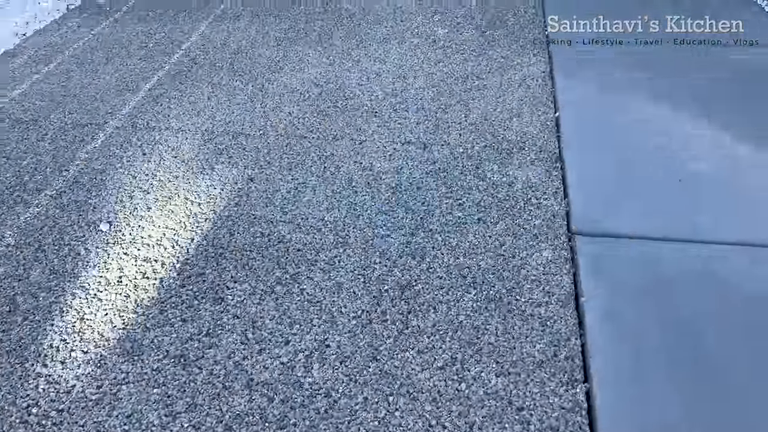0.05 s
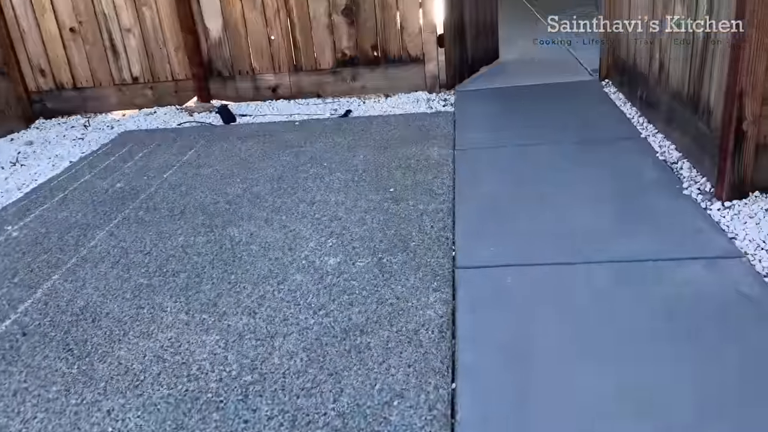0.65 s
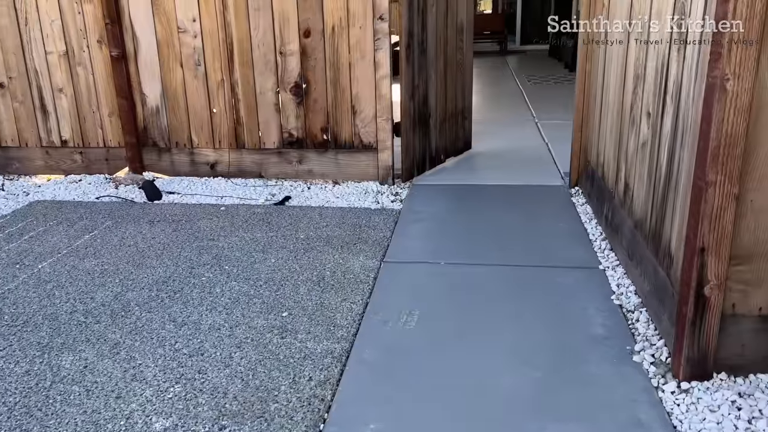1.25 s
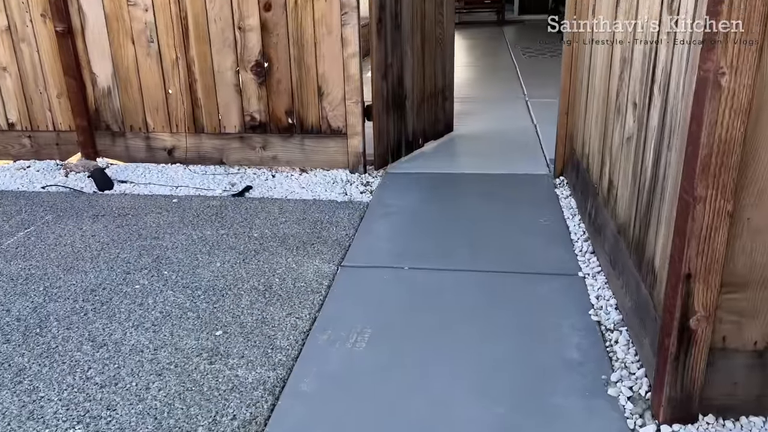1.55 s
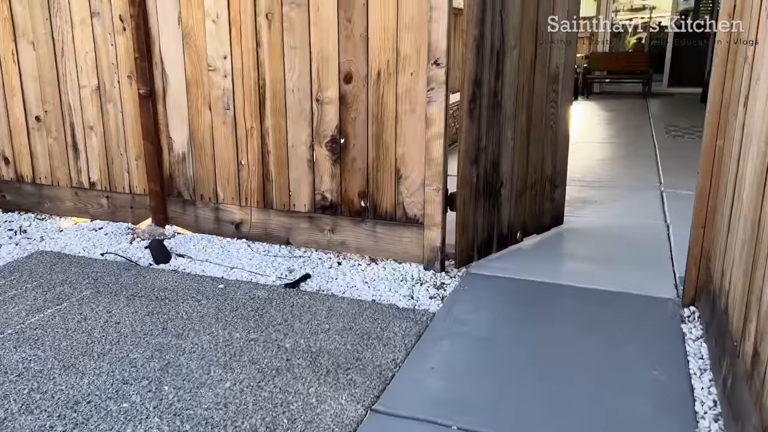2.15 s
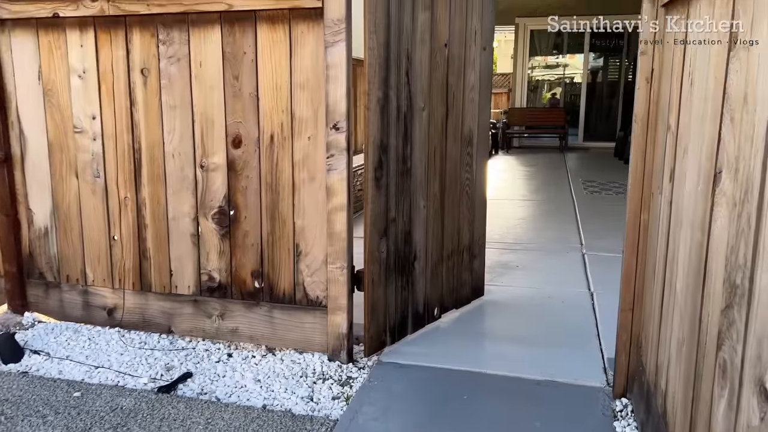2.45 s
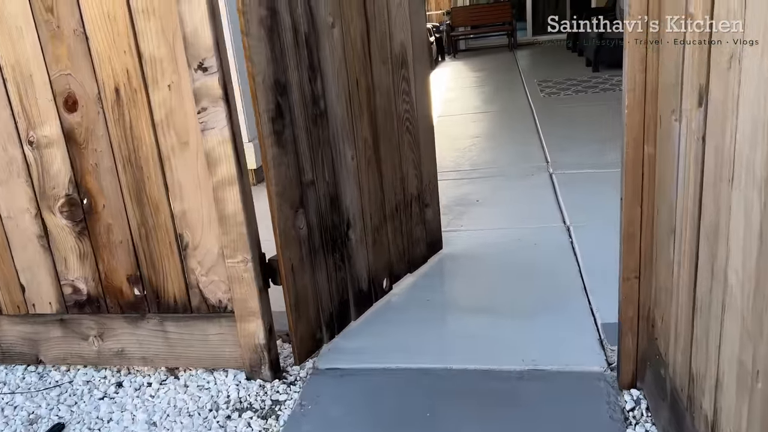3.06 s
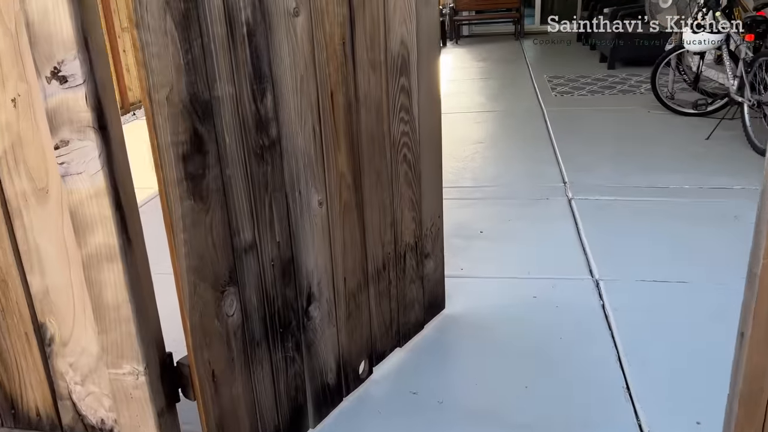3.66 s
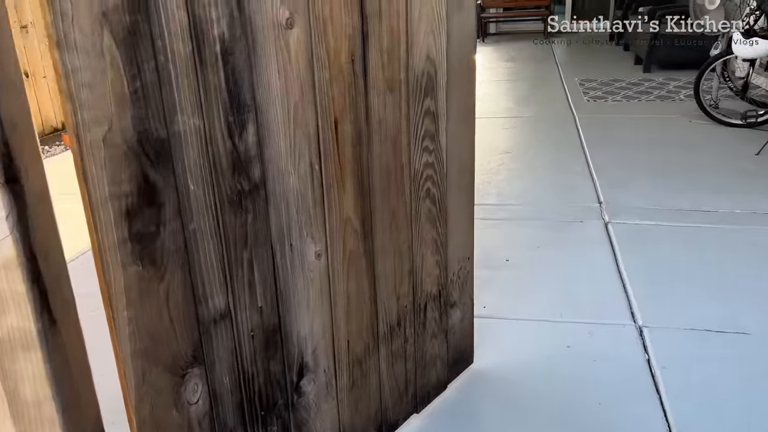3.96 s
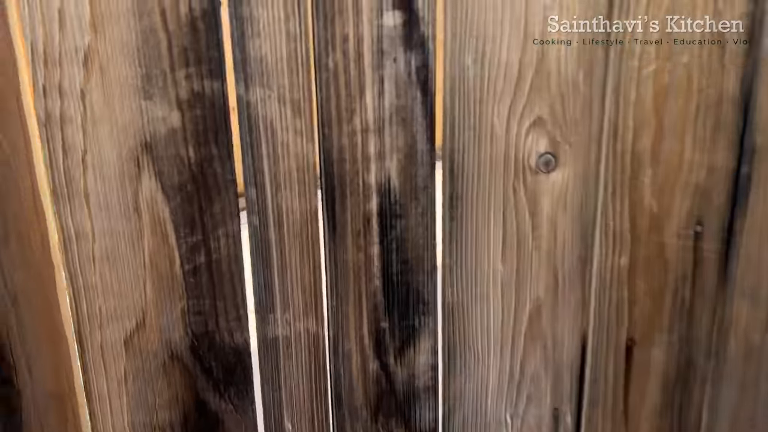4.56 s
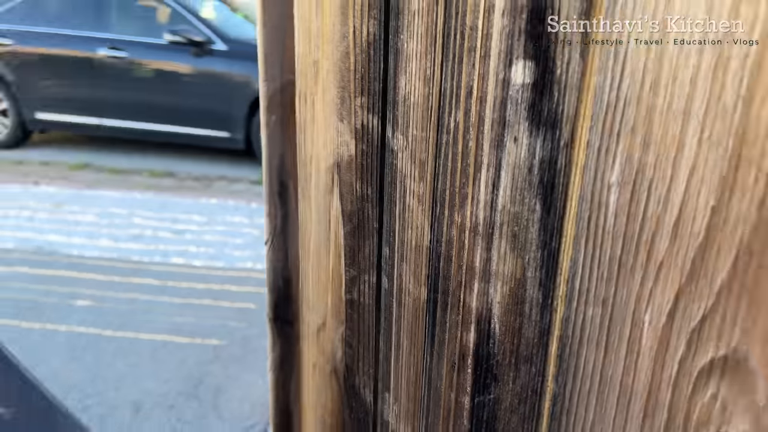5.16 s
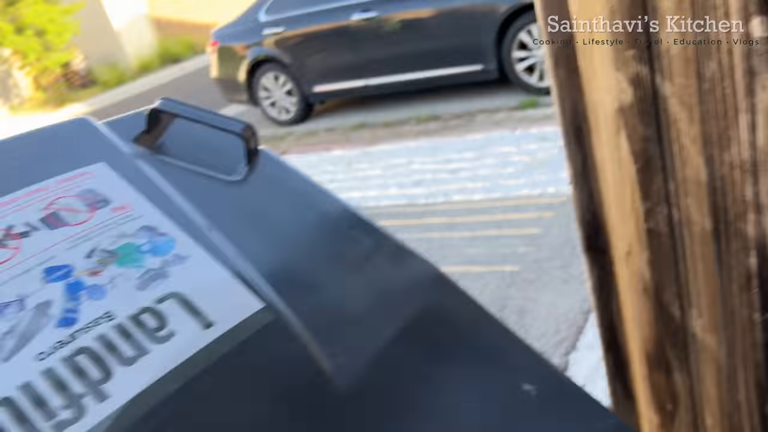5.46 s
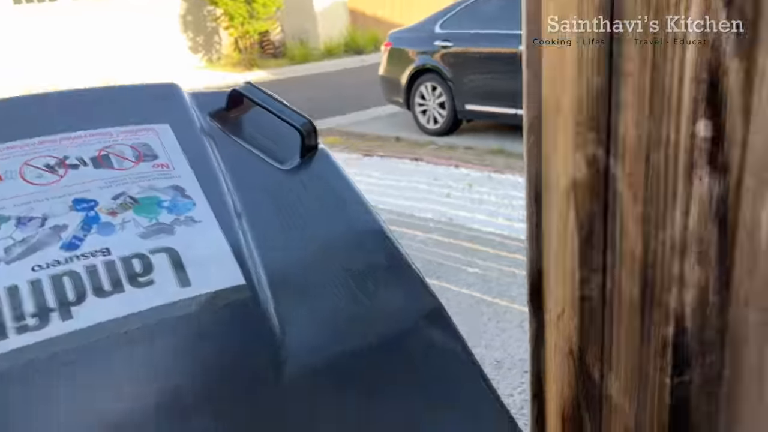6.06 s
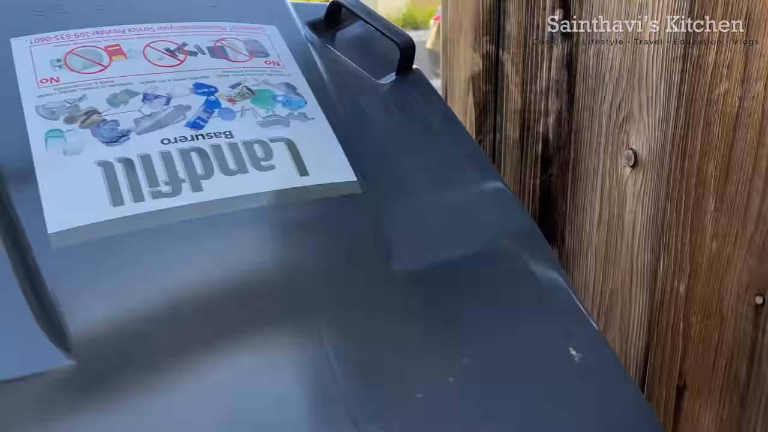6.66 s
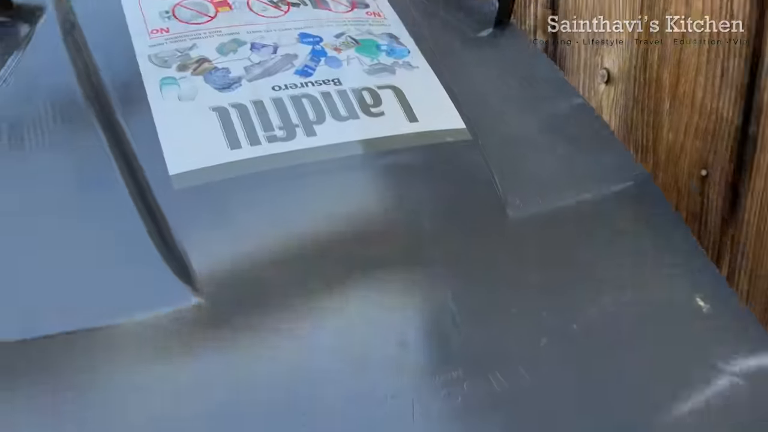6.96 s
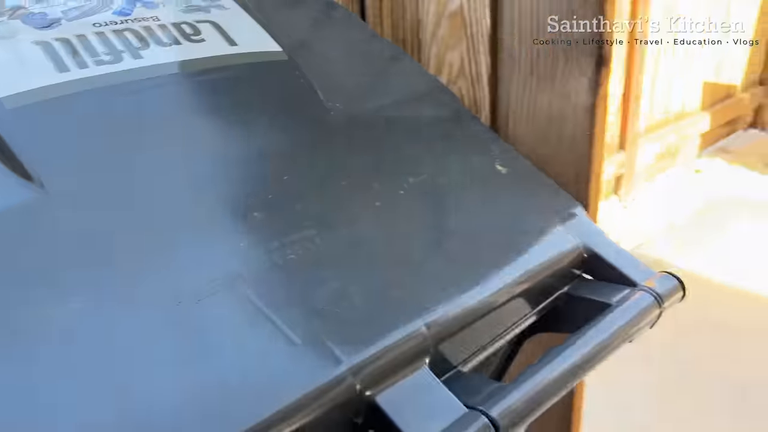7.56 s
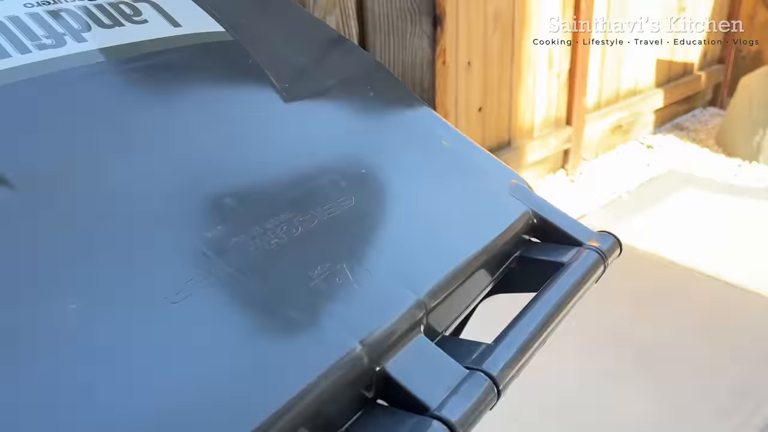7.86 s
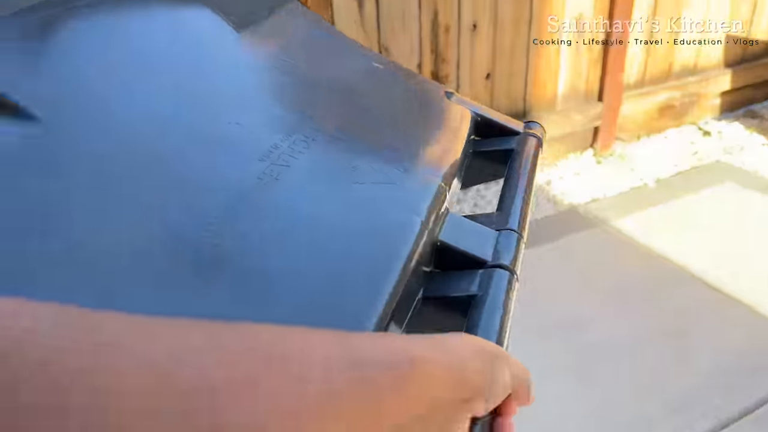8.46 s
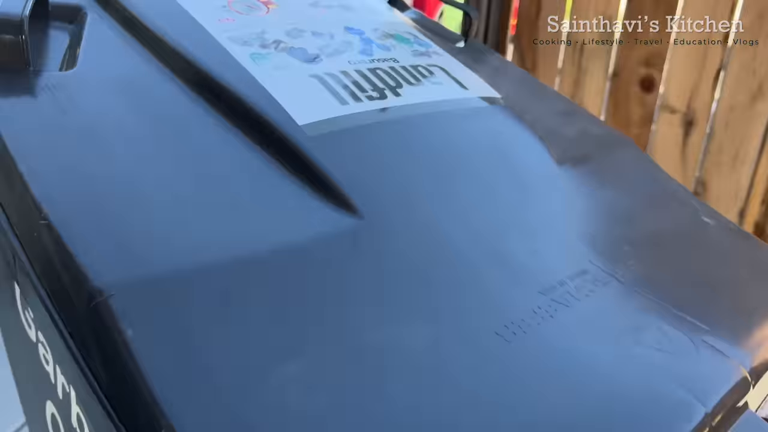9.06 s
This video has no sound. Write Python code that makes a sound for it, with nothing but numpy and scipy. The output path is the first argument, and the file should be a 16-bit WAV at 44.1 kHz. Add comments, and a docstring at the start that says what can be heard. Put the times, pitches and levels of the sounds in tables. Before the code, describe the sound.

A plastic wheelie bin rumbles and knocks over rough paving close by, then is bumped to a stop as a small bird chirps.

```python
"""A hollow rumble and hard knocks, close on the left: a plastic wheelie bin rolls over rough paving.
Stones drum its shell through hard wheels, lid and axle knock, grit snaps and plastic rubs.
The bin swings round in front of the hand-held stereo microphone and is bumped to a stop,
its loudest blows overloading the input. Fence and houses throw back a faint echo; towards
the end a small bird chirps across the yard and a farther one slurs once."""
import sys
import numpy as np
from scipy import signal
from scipy.fft import rfft, irfft
from scipy.io import wavfile
from scipy.ndimage import uniform_filter1d

SR = 44100
rng = np.random.default_rng(int(sys.argv[2]) if len(sys.argv) > 2 else 0)


def waveform_to_disk(signal):
    """Save audio, clipped to [-1, 1], as 16-bit WAV at the path in sys.argv[1]."""
    frames = np.transpose(np.atleast_2d(signal))
    scaled = np.clip(frames, -1, 1) * 32767
    samples = np.round(scaled).astype(np.int16)
    wavfile.write(sys.argv[1], SR, samples)


N = 410561
TIME = np.arange(N) / SR

# Levels are relative within a column; each source adds its own gain.
# the long pull, then the parking shoves: (time [s], wall drumming [dB], crunch at the tread [dB])
ROLL = [(0.0, -10.5, -35), (0.44, -11, -33), (0.6, -15.5, -36.5), (0.77, -14, -38), (1.11, -13.5, -30.5),
        (1.5, -14, -38.5), (1.63, -13, -31.5), (1.76, -11, -30), (2.41, -18, -47), (2.98, -21.5, -50.5),
        (3.53, -19, -45), (3.78, -15, -43), (4.17, -14.5, -40), (4.3, -12, -31.5), (4.72, -19, -40),
        (5.13, -10, -36), (5.39, -13, -40.5), (5.55, -14, -54), (5.73, -42, -49), (5.86, -32, -105),
        (6.09, -38.5, -48), (6.27, -35.5, -51), (6.53, -20, -55), (6.64, -21, -43), (6.82, -17, -50),
        (7.0, -25.5, -35), (7.41, -14.5, -35), (7.54, -16.5, -56), (7.88, -17, -40), (8.11, -26.5, -47),
        (8.38, -19, -68), (8.66, -13.5, -45.5), (8.76, -6, -34), (8.92, -19.5, -50.5), (9.18, -29.5, -50),
        (9.31, -32.5, -55)]
# the shell sways: (time [s], boom of the air inside [dB], lid flutter [dB])
SWAY = [(0, -2.5, -16), (0.55, -19, -12), (0.75, -23, -19), (1.12, -23, -11), (1.4, -20.5, -18),
        (2.0, -17.5, -17.5), (2.6, -24, -21), (3.0, -18, -18.5), (3.55, -29, -17), (4.1, -25, -14.5),
        (4.35, -24, -9), (4.75, -19, -14), (5.3, -11, -9), (5.6, -9.5, -17), (6.0, -25, -29),
        (6.2, -20.5, -21), (6.7, -14, -30.5), (7.0, -14.5, -13), (7.5, -13.5, -15), (7.9, -11, -22.5),
        (8.2, -21.5, -20), (8.8, -10, -15.5), (9.05, -18.5, -25.5), (9.31, -16, -31)]
# loose wheels on the axle: (time [s], rattle against the drumming [dB])
RATTLE = [(0, -17), (1.55, -13.5), (2.1, -21), (2.7, -15.5), (3.4, -15.5), (3.9, -10), (4.4, -15.5),
          (4.7, -16), (5.5, -28), (6.3, -22), (7.3, -23.5), (9.31, -15)]
# deep modes of the air in the bin and of the lid: (frequency [Hz], width [Hz], level [dB])
CAVITY_MODES = [(40.3, 6.5, -35), (62.2, 9.3, 16)]
LID_MODES = [(83, 16.5, 3), (107.8, 14.2, -4.5), (140, 41.5, -4.5)]
# resonances of the walls and of a hollow wheel: (frequency [Hz], width [Hz], lift [dB])
WALL_MODES = [(190, 35, 7), (250, 6.1, 4.5), (272.4, 16, 6), (340, 120, 4.5), (535, 78, 7), (631, 14, 12),
              (1130, 36, -24.5), (1700, 360, 4.5), (2550, 200, 1.5)]
WHEEL_MODES = [(986, 15, 0.43), (1144, 210, 1.45), (1409, 620, 4.5), (1713, 14, 0.63), (2805, 79, 0.76)]
# tone colours at the microphone: (frequency [Hz], level [dB])
DRUM_SPECTRUM = [(50, -26), (100, -7.5), (142, 2.5), (230, -2), (320, -7), (450, -8.5), (650, -21),
                 (900, -28), (1500, -48.5), (2500, -37), (5000, -72), (16000, -111)]  # walls, rolling
CLACK_SPECTRUM = [(300, -58.5), (700, 4.5), (1100, -2), (1800, -7.5), (2400, -16), (3000, -38.5),
                  (4000, -20), (16000, -63)]  # hollow wheel
CRUNCH_SPECTRUM = [(200, -24), (700, 12), (1500, 4), (2600, 2.5), (3800, -3), (6000, -4.5), (7200, -10.5),
                   (8600, -7.5), (11000, -19.5), (16000, -27)]  # grit under the tread
RIB_SPECTRUM = [(600, 21.5), (850, 0.5), (1300, -8), (1900, 12.5), (2700, 1), (3300, 2)]  # ribs and spokes
AIR_SPECTRUM = [(30, -10.5), (100, 10.5), (300, -21), (1000, -49), (3000, -25), (6000, -30), (9000, -37),
                (11000, -48.5), (16000, -84)]  # open yard
THUD_SPECTRUM = [(40, -20), (90, -8.5), (200, -1), (330, -6), (600, -9.5), (900, -17), (1500, -31),
                 (3000, -41), (16000, -83)]  # walls, struck
CRACK_SPECTRUM = [(200, -25), (700, 3), (1400, -1.5), (2600, 1), (4000, -6.5), (7000, -7.5), (8600, -9.5),
                  (11000, -17.5), (16000, -33.5)]  # hard edges meeting
BITE_SPECTRUM = [(300, -12.5), (700, -3), (1500, 1.5), (2700, -4.5), (3800, -7.5), (8000, -17.5),
                 (16000, -39)]  # tread on a paving edge
SNAP_SPECTRUM = [(500, -20), (2000, -14), (4000, 12.5), (7000, 6), (8600, 12), (11000, 1), (16000, -14)]  # one grain breaking
TICK_SPECTRUM = [(300, -9), (900, 3), (2200, -4.5), (4400, -13), (5600, -10), (16000, -52.5)]  # plastic edge
# ring of the shell, scaled for each kind of blow: (frequency [Hz], base t60 [s])
SHELL_DECAY = [(100, 0.73), (300, 0.53), (1000, 0.45), (3000, 0.15), (8000, 0.072), (16000, .07)]
# wheels drop into joints and hop on the axle, the lid bounces:
# (time [s], crack [dB], thud [dB], clack [dB], panel pitch [Hz], wheel pitch [Hz])
KNOCKS = [(0.029, -26.5, -13, -12.5, 273, 1320), (0.0874, -50, -15, -32, 264, 1125),
          (0.1503, -17.5, -0.5, -10, 242, 836), (0.2296, -22, -4.5, -12, 595, 1020),
          (0.3176, -20, -13, -24, 342, 1070), (0.3843, -19.5, -7, -16, 237, 1340),
          (0.488, -18.5, -6.5, -12, 271, 1140), (0.535, -21.5, -7, -12, 301, 1025),
          (0.7385, -37, -6, -31, 593, 920), (0.7864, -35, -13, -20, 513, 1140),
          (0.8211, -24, -8.5, -14, 660, 886), (0.8891, -34, -6, -17, 550, 1076),
          (0.9703, -38, -9, -17, 437, 1170), (1.096, -19.5, -6.5, -11, 261, 1090),
          (1.2115, -43, -10.5, -36, 165, 1090), (1.2737, -24, -7.5, -22, 408, 1790),
          (1.3667, -29, -21, -16.5, 554, 1094), (1.425, -32, -11, -14, 710, 945),
          (1.5149, -34, -5, -15, 686, 1130), (1.5753, -24.5, -7, -10, 498, 1100),
          (1.5998, -27, -6, -14, 654, 913), (1.7844, -23.5, -9, -18, 580, 980),
          (1.8289, -23, -9, -16, 228, 850), (1.8741, -17.5, -4.5, -11.5, 574, 1140),
          (1.9534, -23, -17, -18, 656, 1600), (2.0813, -43, -22, -27, 446, 1082),
          (2.2088, -24, -10.5, -26, 310, 980), (2.2522, -25, -9.5, -18, 580, 1010),
          (2.2924, -24.5, -19, -30, 173, 1022), (2.537, -34, -10, -18.5, 632, 1160),
          (2.63, -32, -18, -18, 190, 1010), (2.6558, -23, -10.5, -11.5, 620, 1652),
          (2.7197, -31.5, -13, -22, 545, 1028), (2.866, -36, -11.5, -14, 290, 1305),
          (3.045, -48, -15, -19, 200, 1320), (3.1092, -25.5, -15.5, -15.5, 596, 1620),
          (3.267, -29, -14, -14, 620, 1687), (3.4929, -42, -18, -21, 590, 1140),
          (3.628, -26.5, -9.5, -14.5, 570, 1137), (3.6914, -46, -16, -20.5, 252, 1380),
          (3.7901, -31.5, -15, -15.5, 560, 1110), (3.828, -32, -10, -15.5, 437, 1166),
          (3.8547, -24, -4.5, -13.5, 492, 956), (3.9369, -27.5, -11, -15.5, 480, 1330),
          (4.066, -27, -8.5, -14, 506, 1300), (4.1124, -25, -28, -12.5, 463, 923),
          (4.211, -21.5, -11, -15, 700, 1190), (4.3351, -25, -10, -12, 354, 1220),
          (4.3523, -29, -10.5, -21, 167, 1120), (4.3941, -19, -6.5, -13, 453, 1043),
          (4.436, -19.5, -11, -22, 502, 2540), (4.465, -34, -11.5, -22, 580, 1120),
          (4.6384, -26, -15.5, -24, 234, 1900), (4.679, -48, -11.5, -23, 208, 1204),
          (4.7729, -34, -10, -21, 522, 900), (4.7925, -29.5, -7, -18.5, 530, 931),
          (5.007, -20, -7.5, -15.5, 462, 1200), (5.0618, -23.5, -8.5, -16, 369, 2010),
          (5.1906, -22, -7, -20, 277, 870), (5.2146, -21.5, -7, -28, 285, 870),
          (5.2488, -25.5, -0.5, -33, 612, 860), (5.304, -43, -13, -37, 185, 952),
          (5.3562, -26, -1.5, -21.5, 520, 784), (5.3928, -30, -8.5, -35, 210.6, 965),
          (5.436, -22.5, -10.5, -16.5, 256, 1313), (5.4933, -28.5, -8, -24, 214, 900),
          (5.7404, -26, -18.5, -32, 152, 1190), (5.759, -35.5, -11.5, -27, 209, 1100),
          (6.168, -57, -19, -40, 212, 1150), (6.4568, -40, -9, -40, 200, 1190),
          (6.7625, -44, -11.5, -36, 600, 1140), (6.809, -50, -6.5, -24, 190, 1130),
          (6.8231, -22.5, 0, -12, 595, 1130), (6.8661, -25, -1.5, -16.5, 620, 1140),
          (6.8933, -34, -6, -20, 166.5, 1260), (6.919, -25, 1, -23, 368, 1080),
          (6.939, -24.5, -10, -17, 171, 1090), (6.9748, -22, -1.5, -17, 311, 880),
          (7.001, -32, -4, -32, 198, 1230), (7.0481, -34, -1.5, -19, 190, 1130),
          (7.0656, -35, -3, -29, 385, 1270), (7.0947, -39, -12, -30, 345, 888),
          (7.244, -46, -8, -33, 216, 990), (7.298, -23.5, -6.5, -23, 198, 1740),
          (7.324, -31, -6.5, -23, 192.6, 955), (7.367, -35, -19, -28, 190, 1840),
          (7.5413, -15, -1.5, -18, 321, 892), (7.594, -23.5, -15, -21, 211, 1130),
          (7.9745, -36, -7, -30, 191, 1100), (8.03, -33.5, -15.5, -28.5, 197, 1640),
          (8.108, -54, -15, -28, 426, 750), (8.3162, -34, -13, -27.5, 240, 1080),
          (8.437, -25, -4, -16.5, 239, 830), (8.4615, -36, -7.5, -28, 200, 860),
          (8.662, -39, -5.5, -19, 265, 1030), (8.6939, -34, -3, -20, 252, 895),
          (8.719, -36, -2.5, -28, 190, 890), (8.7749, -21.5, -2.5, -13.5, 257, 830),
          (8.7902, -21.5, -0.5, -17, 604, 1120), (8.8245, -23, -15, -17, 202, 1504),
          (8.8535, -41, -7.5, -18, 563, 860)]
# the body slumps onto its axle: (time [s], level [dB], starting pitch [Hz])
THUMPS = [(0.168, -10, 230), (1.152, -14, 200), (2.022, -13, 200), (2.8605, -4, 333), (3.646, -6, 260),
          (4.688, -7, 220), (4.927, -9, 260), (5.36, -7.5, 360), (7.003, -18, 230), (7.215, -6, 200),
          (7.32, -15, 230), (7.736, -17, 200), (7.548, -10.5, 378), (7.976, -11.5, 330), (8.107, -15, 200),
          (8.438, 0, 293)]
# grit snaps, plastic ticks: (time [s], snap [dB], duller tick [dB])
SNAPS = [(0.403, -33, -35), (1.164, -34.5, -36), (1.662, -37, -24), (1.735, -43, -10), (2.0287, -44, -41),
         (2.102, -46, -19), (2.296, -42, -34), (2.356, -40, -18.5), (2.965, -50, -24), (3.336, -48, -23),
         (3.4726, -41.5, -18), (3.7366, -38.5, -44), (4.965, -33, -45), (4.984, -27.5, -10),
         (5.1034, -35, -15),  (5.41, -38, -16), (6.236, -62, -23.5), (6.438, -41, -23), (6.497, -50, -26),
         (6.562, -55, -24), (6.6684, -37.5, -22), (6.779, -43, -20), (7.472, -27.5, -39), (7.538, -27, -14),
         (7.692, -42, -26), (7.7908, -39, -15.5)]
# plastic rubs: (time [s], length [s], pitch [Hz], level [dB], hoarseness [share of pitch])
RUBS = [(5.055, 0.018, 2000, -24, 0.072), (6.822, 0.044, 1130, -17.5, 0.029), (6.905, 0.03, 523, -15, .04),
        (7.735, 0.19, 950, -38, 0.084), (7.724, 0.11, 1480, -34.5, 0.035), (7.97, 0.13, 1526, -37, 0.076)]
# the nearer bird's calls: (time [s], level [dB])
BIRD_CALLS = [(6.608, -31.5), (6.978, -34.5), (7.334, -38.5), (7.791, -48), (9.196, -45)]
# the two notes of a call: (time into the call [s], length [s], top pitch [Hz], level [dB])
CALL_NOTES = [(0, 0.048, 5700, 1.5), (0.105, 0.035, 5270, 4)]
# the farther bird: (time [s], length [s], first pitch [Hz], last pitch [Hz], level [dB])
SLURS = [(8.02, 0.091, 5060, 3430, -47.5)]
# where the bin is: (time [s], bearing [0 = in front, 1 = left])
BEARING = [(0, 0.83), (2.3, 0.81), (3, 0.85), (4.6, 0.43), (5.2, 0.0069), (9.31, 0.0067)]
# the two microphone ports: (frequency [Hz], left-right likeness [0 to 1], left louder by [dB])
MIC_PORTS = [(60, 0.98, 1.5), (200, 0.79, 0), (430, 0.74, 3.5), (770, 0.25, 2.5), (1970, 0.22, 0.7),
             (4000, 0.27, -0.5), (6940, 0.05, 3.5), (9600, 0.98, -0.5), (16000, 0.41, 1)]

ECHO_DB, ECHO_T60_S = -19, .55  # a knock coming back from fence and house


def amp(db):
    """Decibels to amplitude."""
    return 10 ** (np.asarray(db) / 20)


def unit(x):
    """Scale to an RMS of 1."""
    return x / np.sqrt(np.mean(x ** 2) + 1e-20)


def steady(x, seconds):
    """Hold the level near 1 over the given time; quicker grain stays."""
    power = uniform_filter1d(np.mean(x ** 2, 0), int(seconds * SR / 2) + 1)
    return x / np.sqrt(uniform_filter1d(power, int(seconds * SR) + 1) + 1e-12)


def at_hz(table, hz):
    """Every column of a table, joined by lines on a log-frequency axis."""
    freqs, *columns = np.transpose(table)
    return np.squeeze([np.interp(np.log(hz + 1), np.log(freqs), c) for c in columns])


def curves(table):
    """Every column of a table at every sample."""
    times, *columns = np.transpose(table)
    return [np.interp(TIME, times, c) for c in columns]


def add(mix, s, sound):
    """Mix a sound in at s seconds."""
    part = mix[:, max(round(s * SR), 0):][:, :sound.shape[1]]
    part += sound[:, :part.shape[1]]


def colour(spectrum, modes=(), size=4096):
    """Minimum-phase impulse response of a spectrum with resonances on top."""
    hz = np.fft.rfftfreq(size, 1 / SR)
    lift_db = sum(lift / (1 + (2 * (hz - f) / width) ** 2) for f, width, lift in modes)
    cepstrum = irfft(np.log(amp(at_hz(spectrum, hz) + lift_db)))
    cepstrum[1:size // 2] *= 2
    cepstrum[size // 2 + 1:] = 0
    return irfft(np.exp(rfft(cepstrum)))[None]


def stones(per_s, spread_db):
    """Random bumps under the wheels, mostly small, a few large."""
    size = amp(spread_db * np.minimum(rng.exponential(1, N), 4)) * rng.choice([-1, 1], N)
    return size * (rng.random(N) < per_s / SR)


def sway(bumps, modes):
    """Bumps drive a few deep resonances."""
    hz = np.fft.rfftfreq(N, 1 / SR)
    response = sum(amp(db) / (1 + 1j * (hz - f) / width) ** 2 * (-1) ** k
                   for k, (f, width, db) in enumerate(modes))
    return irfft(rfft([bumps, rng.permutation(bumps)]) * response, N)


def ring(tone, decay_scale, echo_db=ECHO_DB, echo_t60=ECHO_T60_S):
    """One blow at two ports: dense modes die band by band, fence and house return a faint tail."""
    hz, t, noise = signal.stft(rng.choice([-1., 1.], (2, 16384)), SR, nperseg=128)
    t60 = decay_scale * at_hz(SHELL_DECAY, hz)[:, None]
    decay = amp(-60 * t / t60) + amp(echo_db - 60 * t / echo_t60)
    blow = signal.fftconvolve(signal.istft(noise * decay, SR, nperseg=128)[1], tone, axes=1)
    return blow / np.sqrt(np.mean(blow[:, :SR // 80] ** 2))


def shake(bumps, tone, decay_scale, echo_db, paths):
    """Each bump reaches the shell by one of several paths, each with its own ring."""
    out, path = np.zeros((2, N)), rng.integers(0, paths, N)
    for k in range(paths):
        response = ring(tone, decay_scale, echo_db, echo_t60=1.0)
        out += signal.oaconvolve((bumps * (path == k))[None], response, axes=1)[:, :N]
    return out


def rib_pings(per_s, spread_db, decay_cycles, ribs=32):
    """Each stone rings one small rib or spoke."""
    out, t = np.zeros((2, N)), np.arange(1500) / SR
    bumps, rib = stones(per_s, spread_db), rng.integers(0, ribs, N)
    for k, hz in enumerate(np.geomspace(RIB_SPECTRUM[0][0], RIB_SPECTRUM[-1][0], ribs)):
        envelope = np.exp(-hz * t / decay_cycles) * (1 - np.exp(-hz * t))
        tone = np.sin(2 * np.pi * (hz * t + rng.random((2, 1))))
        ping = amp(at_hz(RIB_SPECTRUM, hz)) * envelope * tone
        for at in np.flatnonzero(bumps * (rib == k)):
            add(out, at / SR, bumps[at] * ping)
    return out


def wheel_contact(hop_s=.028, hop_db=-4):
    """Grip on the paving: it loosens as the wheels hop just before each knock."""
    aloft = np.zeros(N)
    for s, *_ in KNOCKS:
        aloft[(TIME > s - hop_s) & (TIME < s)] = 1
    return amp(hop_db * uniform_filter1d(aloft, size=SR // 200))


def rolling():
    """Close by, stones pump the air in the bin, shake lid and walls, rattle the wheels and crunch."""
    boom_db, lid_db = curves(SWAY)
    drum_db, crunch_db = curves(ROLL)
    rattle_db = drum_db + curves(RATTLE)[0]
    bumps = stones(per_s=520, spread_db=4.5)
    boom = steady(sway(bumps, CAVITY_MODES), 0.84) * amp(boom_db - 3)
    lid = steady(sway(rng.permutation(bumps), LID_MODES), 0.089) * amp(lid_db)
    walls = shake(bumps, colour(DRUM_SPECTRUM, WALL_MODES), decay_scale=0.5, echo_db=-19.5, paths=5)
    drum = steady(walls, 0.084) * amp(drum_db - 0.5)
    jolts = bumps * (rng.random(N) < .2)
    wheels = shake(jolts, colour(CLACK_SPECTRUM, WHEEL_MODES), decay_scale=0.81, echo_db=-32, paths=3)
    rattle = steady(wheels, 0.58) * amp(rattle_db)
    grains = bumps + stones(per_s=220, spread_db=3)
    grit = shake(grains, colour(CRUNCH_SPECTRUM), decay_scale=0.22, echo_db=-22.5, paths=3)
    ribs = rib_pings(per_s=670, spread_db=3, decay_cycles=26)
    rib_db = 14 + 1.38 * crunch_db  # ribs ring most on rough paving
    crunch = steady(grit, 0.33) * amp(crunch_db + 6.5) + steady(ribs, 0.16) * amp(rib_db)
    return boom + lid + wheel_contact() * (drum + rattle + crunch)


def yard_air():
    """Quiet outdoor wash all round the microphone."""
    wash = signal.oaconvolve(rng.standard_normal((2, N)), colour(AIR_SPECTRUM), axes=1)[:, :N]
    return amp(-41.5) * unit(wash)


def struck_mode(hz, t60, rise_s):
    """One struck mode dies away, heard at both ports."""
    t = np.arange(SR // 3) / SR
    envelope = amp(-60 * t / t60) * (1 - np.exp(-t / rise_s))
    return np.sin(2 * np.pi * hz * t) * envelope * np.array([[1], [.45]])


def tread_bite(wheel_hz, per_s=1100, peak_s=.002, overtone=2.3):
    """The tread meets an edge in a scatter of small dry contacts, coloured by a wheel overtone."""
    t = np.arange(SR // 50) / SR
    contacts = rng.standard_normal(len(t)) * (rng.random(len(t)) < per_s / SR)
    contacts *= t / peak_s * np.exp(-t / peak_s)
    tone = colour(BITE_SPECTRUM, [(overtone * wheel_hz, 350, 9)])
    click = ring(tone, decay_scale=0.25, echo_db=-40)
    return signal.fftconvolve(click, contacts[None] / (np.linalg.norm(contacts) + 1e-9), axes=1)


def knocks(panel_cycles=42):
    """A blow thuds in one panel and all the walls, rocks the lid and rings a wheel; hard edges crack."""
    out = np.zeros((2, N))
    thud = colour(THUD_SPECTRUM, WALL_MODES)
    clack = colour(CLACK_SPECTRUM, WHEEL_MODES)
    crack = colour(CRACK_SPECTRUM, WHEEL_MODES)
    mode_gains = amp(1.5 * rng.standard_normal((len(KNOCKS), len(WHEEL_MODES))))
    for (s, crack_db, thud_db, clack_db, panel_hz, wheel_hz), gains in zip(KNOCKS, mode_gains):
        panel_db = thud_db + 2.5 + at_hz(THUD_SPECTRUM, panel_hz) / 2
        add(out, s, amp(panel_db) * struck_mode(panel_hz, t60=panel_cycles / panel_hz, rise_s=0.002))
        add(out, s, amp(thud_db - 4.5) * struck_mode(LID_MODES[0][0], t60=0.11, rise_s=0.004))
        add(out, s, amp(thud_db - 8) * ring(thud, decay_scale=0.62))
        # the wheel: one clear note over its weaker modes and a blurred ring
        add(out, s, amp(clack_db + 1) * struck_mode(wheel_hz, t60=0.085, rise_s=0.0012))
        for (hz, _, lift), gain in zip(WHEEL_MODES, gains):
            mode_db = clack_db - 8 + lift + at_hz(CLACK_SPECTRUM, hz) / 2
            add(out, s, gain * amp(mode_db) * struck_mode(hz, t60=0.075, rise_s=0.0012))
        add(out, s, amp(clack_db - 10) * ring(clack, decay_scale=0.45))
        add(out, s, amp(crack_db - 6) * ring(crack, decay_scale=1.95))
        add(out, s, amp(crack_db - 6) * tread_bite(wheel_hz))
    return out


def thumps(peak_s=.007, give_s=.014, sag_share=.55):
    """The body slumps onto its axle: a short hollow note that sinks as the floor of the bin gives."""
    out, t = np.zeros((2, N)), np.arange(SR // 10) / SR
    swell = t / peak_s * np.exp(1 - t / peak_s)
    for s, db, start_hz in THUMPS:
        hz = start_hz * (1 - sag_share * (1 - np.exp(-t / give_s)))
        tone = np.sin(2 * np.pi * np.cumsum(hz) / SR)
        add(out, s, amp(db) * swell * tone * np.array([[1], [.3]]))
    return out


def grit_snaps():
    """Single grains crack and plastic edges tick, too light to stir the walls."""
    out, snap, tick = np.zeros((2, N)), colour(SNAP_SPECTRUM), colour(TICK_SPECTRUM)
    for s, snap_db, tick_db in SNAPS:
        add(out, s, amp(snap_db - 0.5) * ring(snap, decay_scale=0.18, echo_db=-16.5, echo_t60=0.19))
        add(out, s, amp(tick_db - 12.5) * ring(tick, decay_scale=0.28, echo_db=-10, echo_t60=0.36))
    return out


def plastic_rubs():
    """Stick and slip scrapes one mode, which wavers in pitch and strength and comes out hoarse."""
    out = np.zeros((2, N))
    for s, length, hz, db, hoarseness in RUBS:
        count = int(length * SR)
        drifts = uniform_filter1d(rng.standard_normal((2, count + 600)), size=150)[:, 300:-300]
        waver, grip = map(unit, drifts)
        tone = np.sin(2 * np.pi * np.cumsum(hz * (1 + hoarseness * waver)) / SR) * amp(4.5 * grip)
        add(out, s, amp(db) * unit(tone) * signal.windows.tukey(count, .5) * np.array([[1], [.3]]))
    return out


def whistle(hz, db):
    """One bird note: a near sine with a quick flutter in pitch."""
    flutter = unit(uniform_filter1d(rng.standard_normal(len(hz)), size=40))
    tone = np.sin(2 * np.pi * np.cumsum(hz * (1 + .04 * flutter)) / SR)
    return (amp(db) * signal.windows.tukey(len(hz), .3) * tone)[None]


def birds():
    """Across the yard, arched chirps, high then low, and a farther slur echo between the houses."""
    song = np.zeros((1, N))
    for s, db in BIRD_CALLS:
        for after, length, top_hz, note_db in CALL_NOTES:
            arch = 1 - .32 * abs(np.linspace(-1, 1, int(length * SR))) ** 2.2
            add(song, s + after, whistle(top_hz * arch, db + note_db))
    for s, length, first_hz, last_hz, db in SLURS:
        add(song, s, whistle(np.linspace(first_hz, last_hz, int(length * SR)), db))
    t = np.arange(SR // 2) / SR
    yard = rng.standard_normal((2, len(t))) * (amp(-60 * t / 0.6) + 2.5 * amp(-60 * t / 0.044))
    echo = signal.oaconvolve(song, yard / np.linalg.norm(yard[0]), axes=1)[:, :N]
    return 0.65 * song + amp(-3) * echo


def stereo_microphone(sound, side_delay_s=.00045, top_lag_s=.000275):
    """Two ports hear partly the same sound; the right hears it later while the bin is on the left."""
    hz, t, (left, other) = signal.stft(sound, SR, nperseg=256, noverlap=192)
    likeness, left_db = at_hz(MIC_PORTS, hz)[:, :, None]
    hz = hz[:, None]
    delay = side_delay_s * np.interp(t, *np.transpose(BEARING)) * (hz < 7000)
    turns = hz * delay - top_lag_s * np.maximum(hz - 8300, 0)  # in the top octave the left port lags
    right = (likeness * left + np.sqrt(1 - likeness ** 2) * other) * np.exp(-2j * np.pi * turns)
    pair = np.array([left * amp(left_db / 2), right * amp(-left_db / 2)])
    return signal.istft(pair, SR, nperseg=256, noverlap=192)[1][:, :N]


def scene():
    """The bin close to the microphone, open air around it, birds farther off."""
    wheelie_bin = rolling() + knocks() + thumps() + plastic_rubs() + grit_snaps()
    return stereo_microphone(wheelie_bin + yard_air()) + birds()


def record(dry, low_cut_hz=34, top_hz=15900):
    """The microphone sheds the deepest rumble, rounds off the loudest swings and loses the very top."""
    trimmed = signal.sosfilt(signal.butter(3, low_cut_hz, "highpass", fs=SR, output="sos"), dry)
    rounded = trimmed / (1 + trimmed ** 12) ** (1 / 12)
    band_limit = signal.firwin(511, top_hz, window=("kaiser", 9), fs=SR)
    return signal.oaconvolve(rounded, band_limit[None], "same")


dry = scene()
out = record(dry)
waveform_to_disk(out)
```